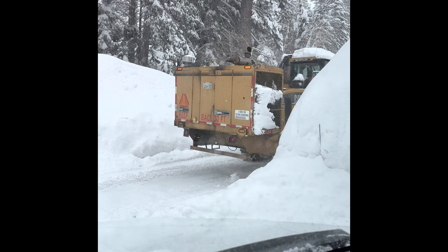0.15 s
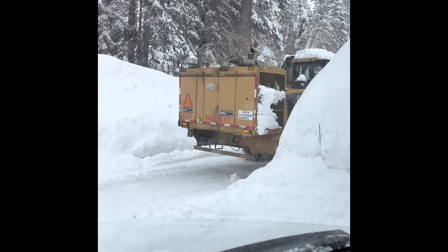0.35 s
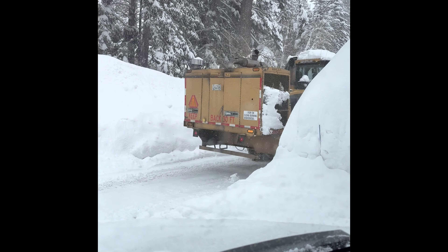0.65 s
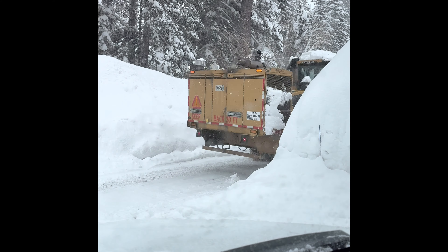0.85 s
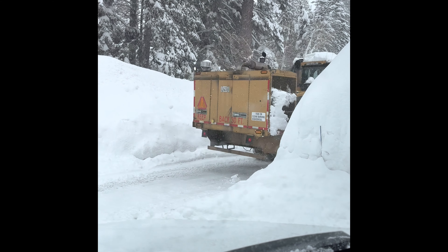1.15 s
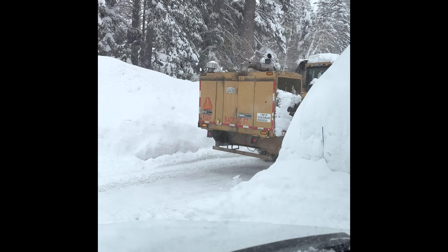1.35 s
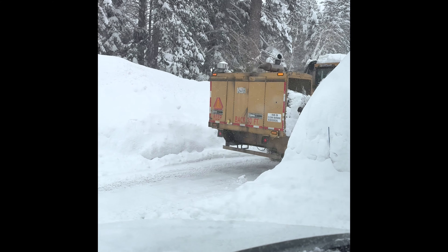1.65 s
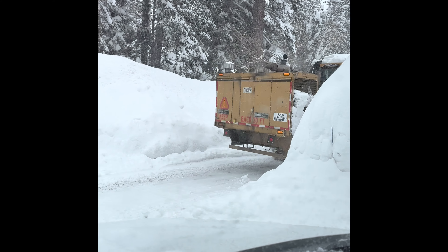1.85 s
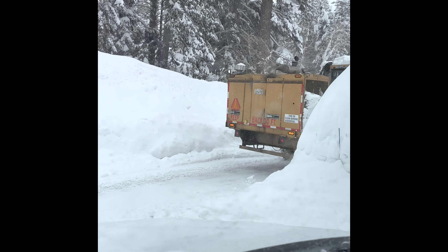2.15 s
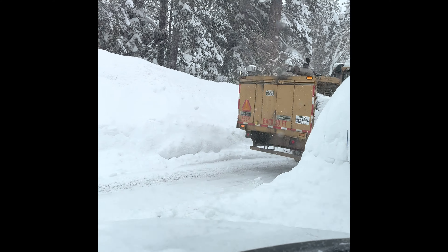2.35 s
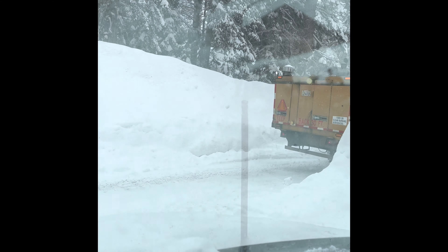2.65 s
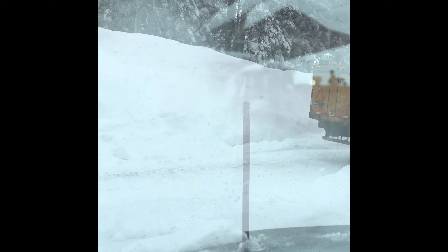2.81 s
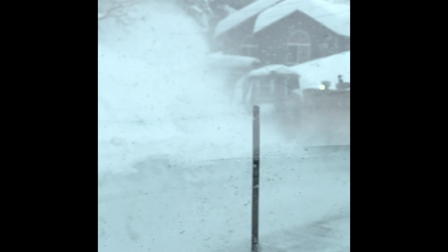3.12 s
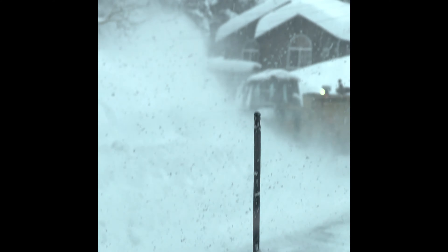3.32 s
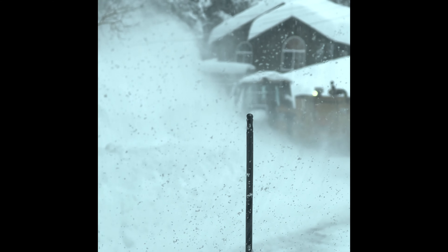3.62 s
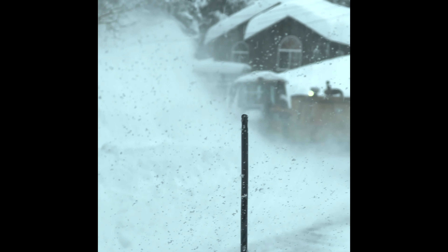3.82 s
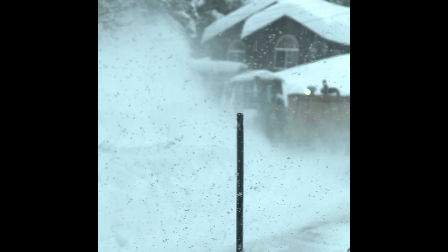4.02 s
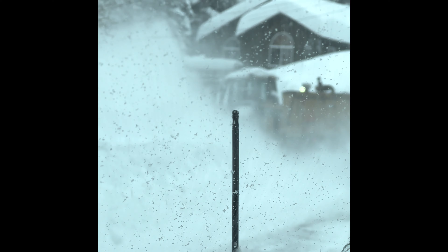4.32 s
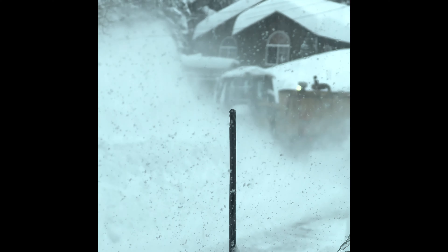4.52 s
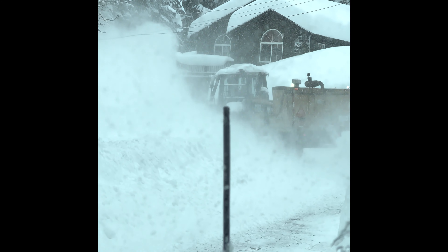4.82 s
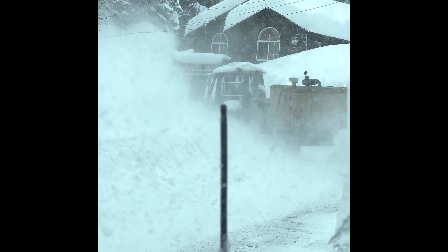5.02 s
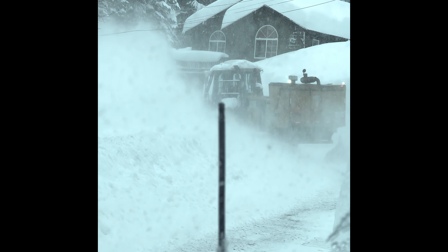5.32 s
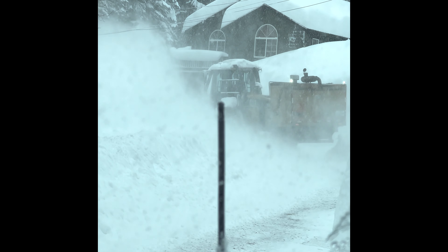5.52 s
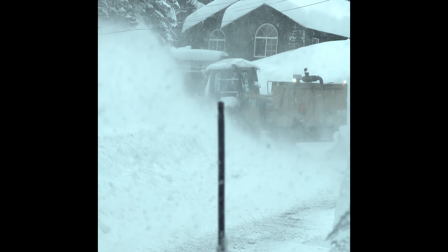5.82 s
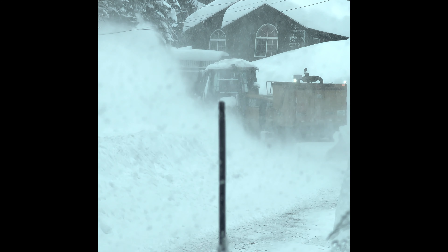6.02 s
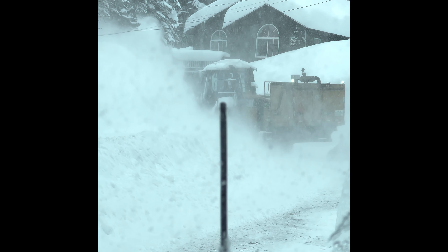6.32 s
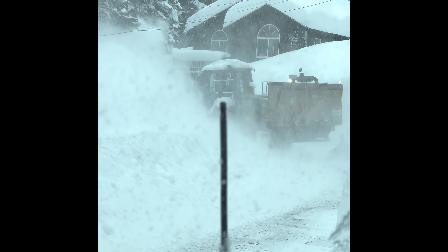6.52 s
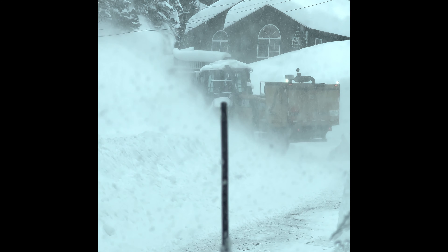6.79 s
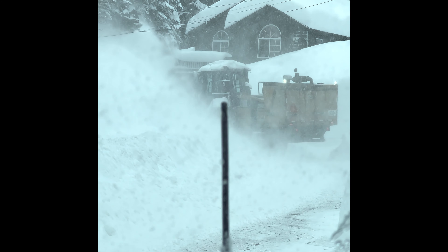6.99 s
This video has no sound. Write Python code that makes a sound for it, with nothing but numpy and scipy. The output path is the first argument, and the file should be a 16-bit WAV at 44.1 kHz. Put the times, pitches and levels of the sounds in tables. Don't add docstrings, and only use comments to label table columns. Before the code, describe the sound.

Close snow blower drones and roars through an open car window, then crossfades to a shut cabin of throbbing idle, dull wash and light rattling.

```python
import sys
import numpy as np
from scipy import signal
from scipy.fft import rfft, irfft, next_fast_len
from scipy.io import wavfile

SR = 44100
rng = np.random.default_rng(int(sys.argv[2]) if len(sys.argv) > 2 else 0)


def field_ratio(decibels):
    return 10 ** (np.asarray(decibels, dtype=float) / 20)


def master(y):
    cut = np.clip(np.atleast_2d(y).T, -1, 1)
    pcm = np.round(cut * 32767)
    wavfile.write(sys.argv[1], SR, pcm.astype(np.int16))


N = 315303
TIME = np.arange(N) / SR


def rms_one(x):
    return x / np.sqrt(np.mean(x ** 2) + 1e-20)


def in_time(rows):
    s, *columns = np.transpose(rows)
    return [np.interp(TIME, s, column) for column in columns]


def at_hz(points, hz):
    point_hz, value = np.array(points).T[:2]
    return np.interp(np.log(hz), np.log(point_hz), value)


def spectrum_hz(size):
    return np.maximum(np.arange(size // 2 + 1) * SR / size, 1)


def drift(rate):
    pole = np.exp(-80 * np.pi * rate / SR)
    noise = rng.standard_normal(N // 40 + 2002)
    slow = signal.lfilter([1], [1, -2 * pole, pole * pole], noise)[2000:]
    return np.interp(np.arange(N) / 40, np.arange(len(slow)), rms_one(slow - slow.mean()))


def ring(x, hz, t60):
    radius, angle = field_ratio(-60 / (t60 * SR)), 2 * np.pi * hz / SR
    poles = [1, -2 * radius * np.cos(angle), radius * radius]
    return signal.lfilter([0, np.sin(angle)], poles, x + 1e-18)


def swell(since, rise, fall):
    return (1 - np.exp(-since / rise)) * np.exp(-since / fall)


def held(start, attack, hold, release):
    since = TIME - start
    return np.clip(since / attack, 0, 1) * np.exp(-np.maximum(since - attack - hold, 0) / release)


def turns(speed, beat_s):
    done = np.cumsum(in_time(speed)[0]) / SR
    return done - done[round(beat_s * SR)]


def orders(cycles, table, lag, waver_db):
    out = 0
    for multiple, level_db in table:
        late = rng.random() if lag is None else lag
        level = field_ratio(level_db + waver_db * drift(1.4))
        out = out + level * np.cos(2 * np.pi * (round(multiple) * cycles - late))
    return np.sqrt(2) * out


def hums(table, waver_db):
    out = 0
    for hz, level_db in table:
        level = field_ratio(level_db + waver_db * drift(1.5))
        out = out + np.sqrt(2) * level * np.cos(2 * np.pi * (hz * TIME + rng.random()))
    return out


# pitch_hz, trail_radians
PORT_TRAIL = [(60, 0), (110, .08), (220, .3), (300, .1), (420, .5), (700, .9), (950, .3), (1500, .1),
              (2400, 0)]


def port_lean(balance, hz):
    return field_ratio(at_hz(balance, hz) / 2) * np.exp(.5j * at_hz(PORT_TRAIL, hz))


def ports(x, balance):
    size = next_fast_len(N)
    lean = port_lean(balance, spectrum_hz(size))
    pair = np.array([lean, 1 / lean])
    return irfft(rfft(x, size) * pair / np.abs(pair.mean(axis=0)), size)[:, :N]


def wide_noise(colour, peaks, likeness, balance, patchy_db):
    size = next_fast_len(N)
    hz = spectrum_hz(size)
    gain_db = at_hz(colour, hz)
    for peak_hz, width_hz, lift_db in peaks:
        gain_db = gain_db + lift_db / (1 + (2 * (hz - peak_hz) / width_hz) ** 2)
    alike = np.clip(at_hz(likeness, hz), 0, 1)
    lean = port_lean(balance, hz)
    mid, side = rfft(rng.standard_normal((2, size))) * field_ratio(gain_db)
    mid, side = np.sqrt(1 + alike) * mid, np.sqrt(1 - alike) * side
    pair = np.array([(mid + side) * lean, (mid - side) / lean])
    out, together = 0, drift(2.3)
    for octave in range(4, 15):
        share = np.cos(np.pi / 2 * np.clip(np.log2(hz) - octave - .5, -1, 1)) ** 2
        band = irfft((pair * share).astype(np.complex64), size)[:, :N]
        out = out + band * field_ratio(patchy_db * (0.49 * together + drift(21.0)))
    return out / np.sqrt(np.mean(out.mean(axis=0) ** 2))


# pitch_hz, level_db (per Hz)
WASH = [(20, -81), (35, -71.5), (58, -65.5), (100, -72.5), (135, -76), (450, -84.5), (850, -87.5),
        (1000, -99), (1900, -101), (2560, -105), (2760, -114), (3300, -119.5), (4800, -127), (10300, -131),
        (10900, -136)]
# pitch_hz, width_hz, lift_db
WASH_PEAKS = [(120, 25, 4), (175, 30, 3), (222, 20, 4), (520, 40, 4), (699, 26, 10), (920, 30, 4),
              (1089, 25, 6), (1350, 20, 5), (1574, 25, 6), (1803, 12, 8), (2118, 40, 5), (2247, 35, 9),
              (2370, 60, -3), (2500, 30, 9), (2735, 20, 6), (4950, 200, -5)]
# pitch_hz, likeness (0 to 1)
SHUT_LIKENESS = [(110, .999), (190, .97), (350, .91), (630, .62), (1140, .68), (1600, .93), (2040, .99),
                 (6000, .99)]
# pitch_hz, left_over_right_db
SHUT_BALANCE = [(150, 0), (370, 1), (590, 4), (930, 5), (1470, 1.5), (2330, 0)]


def muffled_wash(open_share):
    wash = wide_noise(WASH, WASH_PEAKS, SHUT_LIKENESS, SHUT_BALANCE, patchy_db=.3)
    return (1 - open_share) * field_ratio(-44) * wash


# start_s, speed_hz (engine cycles)
IDLE_EARLY_SPEED = [(0, 5.77), (.6, 5.765), (1.0, 5.725), (1.5, 5.7), (1.9, 5.64), (3.3, 5.64)]
IDLE_LATE_SPEED = [(0, 5.0), (3.6, 5.002), (4.0, 4.99), (4.4, 5.005), (5, 5.011), (5.6, 5.006),
                   (7.15, 5.005)]
IDLE_EARLY_BEAT_S, IDLE_LATE_BEAT_S = .9407, 4.827
# multiple (of the cycle), level_db (rms)
IDLE_EARLY = [(7, -55), (8, -41), (9, -41), (11, -34.5), (13, -45), (18, -52), (21, -52), (27, -52)]
IDLE_LATE = [(11, -36), (13, -39), (16, -50), (18, -56), (21, -58), (24, -48)]
# multiple, level_db (rms)
IDLE_LATE_SEAT = [(8, -42.5)]
# multiple, level_db (rms)
IDLE_LATE_LOOSE = [(5, -71), (6, -66), (7, -64), (9, -58), (10, -60), (12, -54), (14, -59), (23, -57),
                   (27, -63), (30, -60), (45, -61)]
# pitch_hz, level_db (rms)
HUM_EARLY = [(27.2, -50.5), (156.9, -59.5), (206, -54.5)]
HUM_LATE = [(54.0, -52), (77, -57), (79, -54), (86.9, -54), (101.9, -54), (220, -62)]


def car(open_share):
    early_cycles = turns(IDLE_EARLY_SPEED, IDLE_EARLY_BEAT_S)
    early = orders(early_cycles, IDLE_EARLY, -.16, waver_db=1.0)
    early += hums(HUM_EARLY, waver_db=1.5)
    late_cycles = turns(IDLE_LATE_SPEED, IDLE_LATE_BEAT_S)
    late = orders(late_cycles, IDLE_LATE, .11, waver_db=.7)
    late += hums(HUM_LATE, waver_db=2.0)
    late += orders(late_cycles, IDLE_LATE_SEAT, .19, waver_db=.7)
    late += orders(late_cycles, IDLE_LATE_LOOSE, None, waver_db=2.0)
    return open_share * early + (1 - open_share) * late


# pitch_hz, level_db
SPRAY_COLOUR = [(2000, -22.5), (3500, -1), (5000, -1.5), (8000, -1), (10200, -6.5), (10800, -10.5),
                (15700, -11)]
# start_s, attack_s, hold_s, level_db
GUSTS = [
    (2.02, 0.068, .3, -70),
    (2.3, .1, 0.024, -65.5),
    (2.461, .15, .25, -60),
    (2.931, 0.055, .25, -75),
    (7.092, .02, .1, -74),
]
GUST_RELEASE_S, STILL_AIR_DB = 0.11, -103


def spray():
    flow = field_ratio(STILL_AIR_DB)
    for start_s, attack_s, hold_s, gust_db in GUSTS:
        flow = flow + field_ratio(gust_db) * held(start_s, attack_s, hold_s, GUST_RELEASE_S)
    likeness, balance = [(4000, .3), (6500, .85)], [(4000, -1.5), (12000, 0)]
    return flow * wide_noise(SPRAY_COLOUR, [], likeness, balance, patchy_db=-1.0)


# start_s, peak_db, pitch_hz
TICKS = [
    (.135, -61, 8340),
    (2.4, -67, 7070),
    (2.849, -58, 5390),
    (2.914, -51.5, 5200),
    (2.921, -59.5, 7300),
    (2.932, -59, 6570),
]


def ticks():
    out = np.zeros(N)
    for start_s, peak_db, hz in TICKS:
        hit = swell(np.maximum(TIME - start_s, 0), rise=0.001, fall=0.021) * rng.standard_normal(N)
        out += field_ratio(peak_db - 8.0) * ring(hit, hz, 0.0027)
    return signal.sosfilt(signal.butter(4, [4000, 15700], "band", fs=SR, output="sos"), out)


# pitch_hz, level_db, t60_s, group (0 low, 1 middle, 2 high)
TRIM = [(3700, -2, 0.0099, 0), (4100, -1.5, .015, 0), (4380, -4.5, 0.0079, 0), (5610, -3, .016, 1),
        (5930, -1.5, 0.011, 1), (6500, -5.5, 0.0075, 1), (7300, -1.5, 0.006, 2), (8200, 0, .008, 2),
        (9000, -5, 0.0088, 2), (10600, -7.5, .004, 2), (14000, -7.5, .002, 2)]
# start_s, level_db, middle_lead_db, high_lead_db
KNOCKS = [(3.345, -74, -2, -1), (3.533, -73.5, -9, -1), (3.737, -73.5, -2.5, -4), (3.940, -76.5, -4, 2.5),
          (4.146, -72, -15, -2), (4.336, -78, 4.5, 3.5), (4.552, -71, -7, -8), (4.734, -74.5, 1, -3),
          (4.942, -80, 7.5, 3.5), (5.141, -76, 2, -4), (5.351, -72.5, -0.5, -9), (5.537, -78, 2.5, 0.5),
          (5.741, -72.5, -6, -1), (5.941, -84.5, 11, 11), (6.146, -71, -16, -1.5), (6.338, -71, -18, -3.5),
          (6.543, -73.5, 1, -9.5), (6.743, -75.5, -1, -2), (6.944, -72, -8.5, -4)]
# start_s, level_db, middle_lead_db, high_lead_db
REBOUNDS = [(3.449, -79.5, 3.5, 6), (3.628, -77.5, -5.5, -6), (3.846, -79, -3.5, -4),
            (4.019, -77.5, -4.5, -1), (4.093, -78.5, 1, 0.5), (4.225, -84, 7.5, 5.5),
            (4.420, -78, 0.5, 0.5), (4.500, -79.5, -2, -1), (4.632, -71.5, -14.5, -3), (4.821, -78, -1, -2),
            (5.056, -78, -3, -2), (5.223, -78, -4.5, -8.5), (5.837, -79.5, 0.5, -2), (6.025, -79, -4, 2.5),
            (6.269, -72, -10.5, -2), (6.422, -84, 1.5, 0), (6.819, -77, -7, -2), (7.022, -78.5, 1.5, -0.5)]
CHATTER_ATTACK_S, CHATTER_HOLD_S, CHATTER_RELEASE_S = 0.003, 0.014, 0.011


def rattle():
    since = np.arange(3000) / SR
    burst = np.clip(since / CHATTER_ATTACK_S, 0, 1)
    burst = burst * np.exp(-np.maximum(since - CHATTER_HOLD_S, 0) / CHATTER_RELEASE_S)
    start_s, shake_db, middle_db, high_db = np.transpose(KNOCKS + REBOUNDS)
    start = np.round(start_s * SR).astype(int)
    strength_db = rng.normal(0, 2.2, (len(start), len(TRIM)))
    out = np.zeros(N)
    for k, (hz, level_db, t60, group) in enumerate(TRIM):
        lead_db = [0, middle_db, high_db][round(group)]
        shakes = np.zeros(N)
        shakes[start] = field_ratio(shake_db + lead_db + level_db + strength_db[:, k] - 17.5)
        chatter = signal.oaconvolve(shakes, burst)[:N] * rng.standard_normal(N)
        out += ring(chatter, hz, t60)
    return signal.sosfilt(signal.butter(4, [3000, 15700], "band", fs=SR, output="sos"), out)


# start_s, speed_hz (cycles, six firings each)
LOADER_SPEED = [(0, 18.38), (.6, 18.37), (.9, 18.323), (1.3, 18.325), (1.7, 18.39), (2.1, 18.405),
                (3.3, 18.375)]
LOADER_BEAT_S = .2491
# multiple (of the cycle), level_db (under the firing tone)
FIRING = [(6, 1), (12, -9), (18, -31.5)]
# multiple, level_db (under the firing tone)
UNEVEN = [(4, -21.5), (5, -26), (7, -23.5), (8, -34), (9, -36.5), (10, -29), (11, -32.5), (14, -23.5),
          (15, -27.5), (16, -43.5), (22, -30), (30, -41.5)]


def exhaust(cycles):
    uneven = orders(cycles, UNEVEN, None, waver_db=3.0)
    return uneven - orders(cycles, FIRING, 0, waver_db=0.5)


# (relative, added to PUMP_REST_DB)
PUMP = [(1, -31), (2, -36), (3, -32), (4, -42), (5, -49)]
# start_s, hold_s, lift_db (over rest)
SURGES = [
    (-.05, 0.047, 9.5),
    (.12, .04, 7.5),
    (0.769, .06, 9),
    (1.33, .32, 7),
    (2.099, .3, 6),
    (2.79, 0.022, 3.5),
]
PUMP_HZ, PUMP_REST_DB, SURGE_ATTACK_S, SURGE_RELEASE_S = 233, -26, 0.014, .06


def pump():
    load = 1
    for start_s, hold_s, lift_db in SURGES:
        load = load + (field_ratio(lift_db) - 1) * held(start_s, SURGE_ATTACK_S, hold_s, SURGE_RELEASE_S)
    teeth = PUMP_HZ * TIME + 0.049 * drift(1.6)
    return orders(teeth, PUMP, None, waver_db=4.0) * field_ratio(PUMP_REST_DB) * load


# start_s, pitch_hz, level_db
TURBO = [(0, 8040, -88.5), (.55, 8035, -71), (.7, 8000, -80), (1.3, 8450, -78.5), (1.9, 8230, -82),
         (2.2, 8150, -84), (2.5, 8200, -76), (3.1, 8200, -84)]


def turbo():
    turbo_hz, turbo_db = in_time(TURBO)
    level = field_ratio(turbo_db + 4.0 + 2.3 * drift(9.1))
    return level * np.sin(2 * np.pi * np.cumsum(turbo_hz + 12 * drift(30)) / SR)


# pitch_hz, level_db (per Hz)
CHURN = [(20, -71), (50, -50), (90, -53.5), (200, -53), (310, -58.5), (600, -63.5), (1000, -69),
         (1700, -75.5), (2800, -73), (4250, -85), (4800, -94.5), (7000, -100), (9700, -105), (10000, -126),
         (13500, -121)]
# pitch_hz, width_hz, lift_db
CHURN_PEAKS = [(400, 70, 5), (700, 40, 4.5), (1160, 50, 3), (1465, 60, 6), (1700, 60, -4), (2000, 60, 3),
               (2310, 110, 5), (2740, 120, 4), (2985, 60, 6), (3310, 50, 4), (3670, 45, 6), (4150, 150, 4),
               (5520, 250, 5.5), (8100, 500, 3), (9490, 15, 9), (9710, 15, 9)]
# pitch_hz, likeness (0 to 1)
OPEN_LIKENESS = [(100, .998), (190, .96), (350, .88), (630, .74), (1140, .8), (2040, .55), (3300, .5),
                 (4300, .05), (5600, .7), (6500, .97)]
# pitch_hz, left_over_right_db
OPEN_BALANCE = [(150, 0), (240, 1), (370, 3), (590, 5.5), (930, 4.5), (1470, 2), (2330, 1), (3680, 2.5),
                (6000, 0)]


def churned_snow(cycles):
    firing_push = 1 + 0.057 * np.cos(2 * np.pi * 6 * cycles)
    return wide_noise(CHURN, CHURN_PEAKS, OPEN_LIKENESS, OPEN_BALANCE, patchy_db=0.86) * firing_push


# pitch_hz, level_db (rms)
GEAR_LINES = [(1765, -76), (2201, -76), (2317, -73), (2976, -75), (3310, -79)]
# start_s, loss_db
RECEDE = [(0, 0), (1.3, 0), (1.7, -1.5), (2.3, -2), (3.2, -3)]
DRONE_DB, CHURN_DB = -21.5, -36
CHURN_FOLLOWS = 0.69


def loader(open_share):
    loss_db, = in_time(RECEDE)
    cycles = turns(LOADER_SPEED, LOADER_BEAT_S)
    drone = field_ratio(DRONE_DB + loss_db) * exhaust(cycles)
    gears = hums(GEAR_LINES, waver_db=1.5) * field_ratio(3 + CHURN_FOLLOWS * loss_db)
    churn = churned_snow(cycles) * field_ratio(CHURN_DB + CHURN_FOLLOWS * loss_db)
    engine = ports(drone + gears + turbo(), OPEN_BALANCE)
    whine = ports(pump(), [(200, 2.2), (460, 20.0)])
    return open_share * (engine + whine + churn)


DISSOLVE_START_S, DISSOLVE_END_S = 2.326, 3.28


def scene():
    open_share = np.clip((DISSOLVE_END_S - TIME) / (DISSOLVE_END_S - DISSOLVE_START_S), 0, 1)
    cabin = muffled_wash(open_share) + car(open_share)
    glass_and_trim = spray() + ticks() + rattle()
    return cabin + glass_and_trim + loader(open_share)


def low_pass(x):
    return signal.sosfilt(signal.butter(12, 15740, fs=SR, output="sos"), x)


# pitch_hz, side_over_centre_db
PORT_SIDE = [(3000, -63), (4400, -30.5), (4950, 4), (5600, -11), (6500, -18), (7300, -6), (8500, -3),
             (9600, -1.5)]
# pitch_hz, level_db
PORT_CENTRE = [(10200, 0), (11000, -16), (11600, -35.5), (14700, -35.5), (15100, -3.5)]


def record(dry):
    size = next_fast_len(N + SR // 10)
    hz = spectrum_hz(size)
    mid, side = rfft([dry[0] + dry[1], dry[0] - dry[1]], size) / 2
    quarter_turn = 1j * np.sign(6300 - hz)
    side = side + quarter_turn * field_ratio(at_hz(PORT_SIDE, hz)) * mid
    mid = mid * field_ratio(at_hz(PORT_CENTRE, hz))
    heard = irfft([mid + side, mid - side], size)[:, :N]
    return low_pass(heard)


dry = scene()
out = record(dry)
master(out)
```